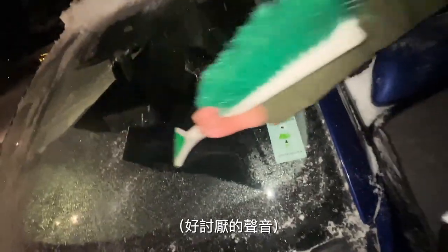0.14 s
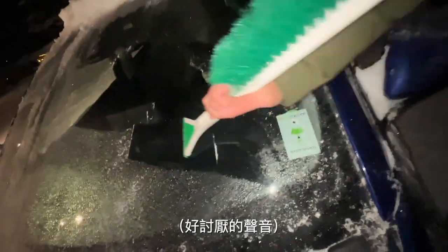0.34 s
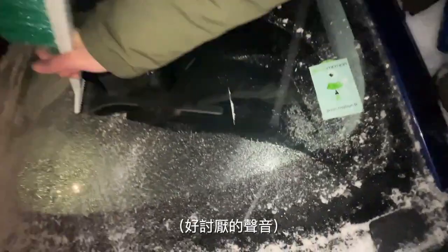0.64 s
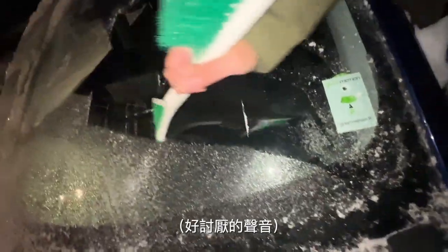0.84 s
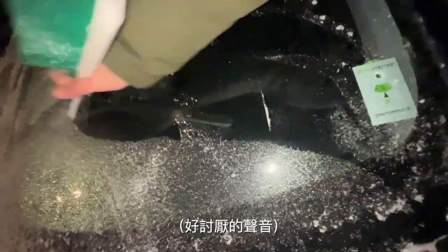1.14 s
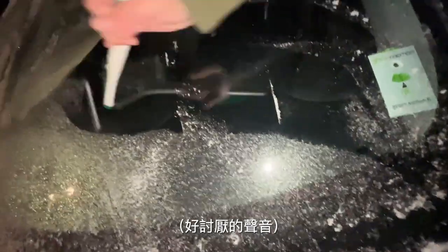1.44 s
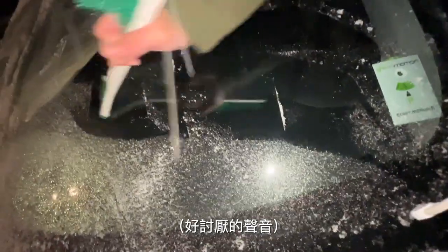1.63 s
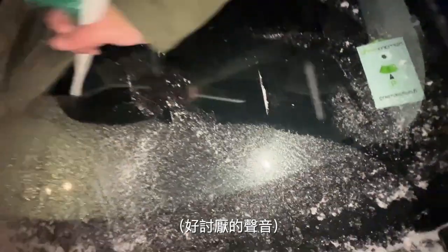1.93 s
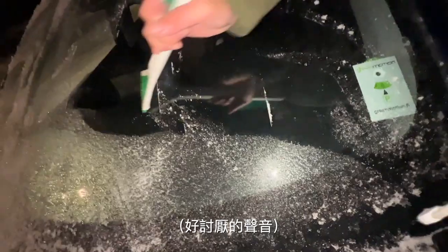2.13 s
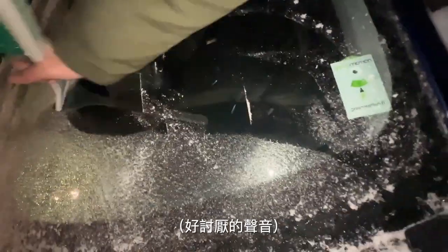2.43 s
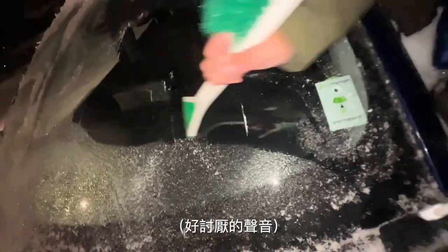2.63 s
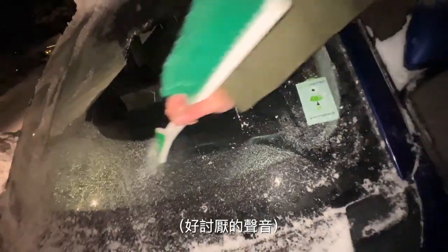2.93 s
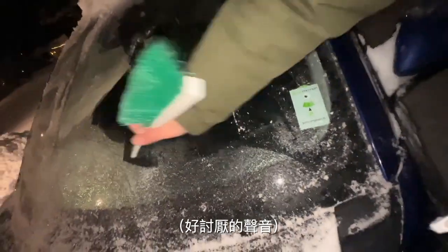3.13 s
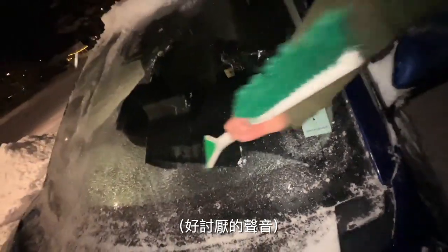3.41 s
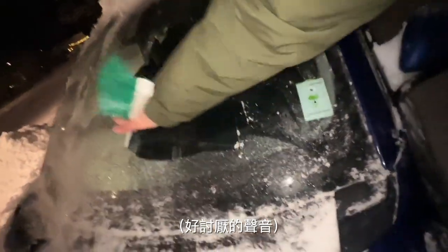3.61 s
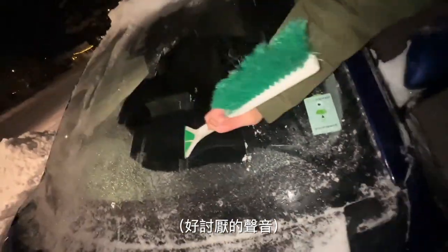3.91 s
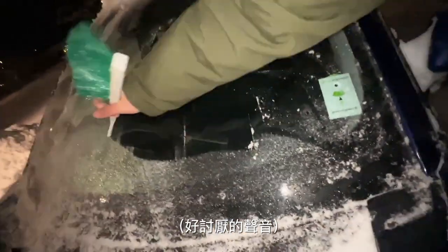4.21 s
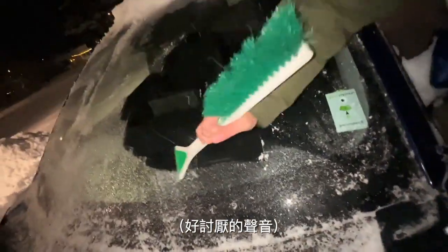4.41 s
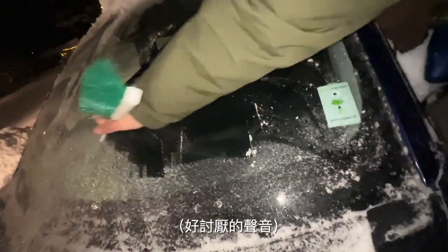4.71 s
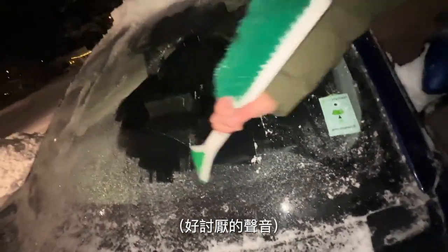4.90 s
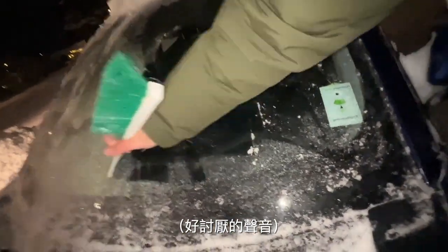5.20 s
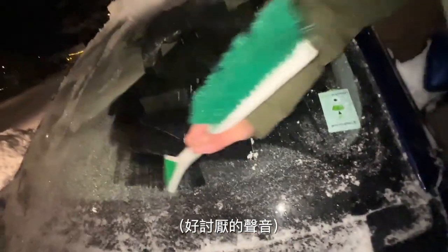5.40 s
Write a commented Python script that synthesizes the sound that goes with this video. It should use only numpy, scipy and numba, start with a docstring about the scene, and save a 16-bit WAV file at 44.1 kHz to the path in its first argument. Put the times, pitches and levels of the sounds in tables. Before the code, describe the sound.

Harsh, gritty ice scraping in short uneven strokes on a windshield, the pane booming lightly, over a steady quiet engine hum.

```python
"""Scraping a frosted windshield

A plastic scraper goes to and fro over a frosted windshield, close to a two-port phone, in an idling car.
Frost crystals snap under the edge: noise impulses that hiss, ring blade and handle, and drum the glass.
The edge also catches on ice ridges and knocks: short noise bursts into the same kinds of resonance.
The engine is a stack of wavering sines on its firing rate; the outdoor air is faint coloured noise.
Each source has a part common to both ports and a part opposite in them."""
import sys
import numpy as np
from scipy import signal
from scipy.fft import rfft, irfft
from scipy.io import wavfile
from scipy.ndimage import uniform_filter1d
from numba import njit

SR = 44100
rng = np.random.default_rng(int(sys.argv[2]) if len(sys.argv) > 2 else 0)


def store_wav(level_fs):
    """Save 16-bit WAV to argv[1]."""
    pcm = np.round(np.clip(np.atleast_2d(level_fs), -1, 1) * 32767)
    wavfile.write(sys.argv[1], SR, pcm.T.astype(np.int16))


N = 244755

# bearing of the edge on the frost, one curve per stroke: (time [s], hiss level [dB])
STROKE_CURVES = [
    [(0.462, -46), (0.468, -24), (0.478, -19.5), (0.494, -26.5), (0.592, -25.5), (0.628, -32.5),
     (0.64, -81)],
    [(0.665, -49), (0.715, -26), (0.747, -23.5), (0.755, -26), (0.765, -32), (0.769, -26), (0.819, -17.5),
     (0.83, -34)],
    [(0.835, -34), (0.847, -33), (0.859, -25.5), (0.867, -42), (0.877, -23.5), (0.9, -70)],
    [(1.0, -41), (1.008, -29.5), (1.068, -24), (1.074, -29.5), (1.144, -16.5), (1.226, -37.5), (1.25, -56)],
    [(1.265, -45), (1.301, -26.5), (1.401, -17.5), (1.413, -19), (1.43, -46)],
    [(1.655, -61), (1.671, -29), (1.685, -21.5), (1.723, -28), (1.775, -31.5), (1.79, -65)],
    [(1.81, -53), (1.838, -30), (1.846, -26.5), (1.856, -20), (1.9, -28.5), (1.94, -57)],
    [(1.97, -53), (1.974, -48), (1.99, -47), (1.996, -49), (2.014, -28.5), (2.02, -40), (2.068, -47),
     (2.08, -75)],
    [(2.23, -49), (2.248, -34.5), (2.26, -44), (2.27, -40.5), (2.3, -44.5), (2.312, -32), (2.318, -36),
     (2.345, -67)],
    [(2.365, -53), (2.383, -26.5), (2.431, -37), (2.453, -18), (2.471, -24), (2.481, -46.5), (2.499, -48),
     (2.52, -61)],
    [(2.78, -40), (2.796, -42), (2.806, -51), (2.848, -31), (2.936, -19.5), (2.976, -20.5), (3.046, -33),
     (3.07, -57)],
    [(3.16, -38), (3.188, -33), (3.2, -19), (3.236, -19.5), (3.25, -28.5), (3.256, -25), (3.314, -45),
     (3.33, -70)],
    [(3.385, -45), (3.409, -45), (3.415, -34.5), (3.439, -30), (3.469, -24), (3.617, -23), (3.647, -36.5),
     (3.665, -68)],
    [(3.76, -44), (3.776, -18), (3.78, -20), (3.8, -67)],
    [(4.06, -49), (4.066, -27.5), (4.072, -28.5), (4.092, -63), (4.106, -21.5), (4.172, -29), (4.182, -59),
     (4.19, -56)],
    [(4.215, -47), (4.225, -28.5), (4.255, -36), (4.265, -51), (4.285, -42), (4.301, -52), (4.311, -45.5),
     (4.36, -50)],
    [(4.365, -35), (4.373, -25.5), (4.381, -19), (4.403, -29), (4.411, -49), (4.415, -33)],
    [(4.42, -32), (4.446, -28.5), (4.494, -23), (4.522, -16.5), (4.604, -19.5), (4.646, -27), (4.66, -39),
     (4.67, -59)],
    [(4.695, -42), (4.705, -30.5), (4.729, -22), (4.741, -29), (4.77, -51)],
    [(4.775, -44), (4.825, -43.5), (4.869, -28.5), (4.881, -49), (4.887, -24), (4.909, -20), (4.937, -26.5),
     (4.95, -47)],
    [(4.955, -40), (5.027, -20.5), (5.089, -22.5), (5.147, -17), (5.191, -21), (5.213, -27), (5.229, -63),
     (5.235, -49)],
    [(5.245, -50), (5.253, -32.5), (5.279, -18.5), (5.301, -24.5), (5.319, -17.5), (5.443, -24),
     (5.455, -42), (5.46, -42)],
    [(5.485, -40), (5.489, -37.5), (5.519, -34.5), (5.523, -32.5), (5.55, -23)],
]
# grip per stroke, same order: (relative blade ring [dB], blade pitch [Hz], relative handle ring [dB],
# handle pitch [Hz], relative glass drum [dB], drum growth over the stroke [dB], glass pitch [Hz])
STROKE_GRIPS = [(-8.5, 1870, -16.5, 460, -5, 3.5, 158), (-9, 2260, -6.5, 655, -2.5, 5, 210),
                (2, 2400, 3, 790, -2.5, 15, 186), (-12.5, 2000, -16.5, 1020, -4, -7, 203),
                (-10, 1860, -7, 930, -2.5, -4, 240), (-13, 2110, -20, 950, -7, 14.5, 210),
                (-5, 2830, -10.5, 1010, -3.5, -14, 200), (1, 2170, -17, 1000, -13, 3, 125),
                (-14, 2800, -6, 1100, -4, 17, 128), (-9.5, 2920, -7, 1180, -2, -9, 263),
                (-5.5, 2030, -7.5, 850, -4, 6, 210), (-3.5, 2440, -10, 930, -17.5, 16, 170),
                (-12, 1350, -12, 880, -6, 9, 220), (0, 1700, -6, 920, -5.5, -5, 210),
                (-9, 2050, -26, 920, -2, 4, 164), (-10, 3300, -11, 870, -6, -1, 150),
                (-3.5, 2330, -3.5, 760, -1.5, 10, 184), (-15.5, 2030, -16.5, 910, -1.5, -4, 123),
                (-10, 3300, -11, 880, -4, -7, 160), (0, 2400, -7, 900, -10.5, 5.5, 150),
                (-8, 1850, -12, 874, -1.5, -5.5, 180), (-8, 2680, -8, 890, -4, 1, 160),
                (5, 1970, 0.5, 830, 0, -4, 148)]
# edge trailing lightly between strokes, one curve per drag: (time [s], hiss level [dB])
DRAG_CURVES = [
    [(0.0, -42), (0.032, -45), (0.152, -42.5), (0.26, -62)],
    [(0.27, -56.5), (0.418, -47.5), (0.46, -47)],
    [(0.91, -50.5), (1.0, -45.5)],
    [(1.435, -51), (1.471, -46), (1.53, -59)],
    [(2.085, -57), (2.23, -59)],
    [(2.58, -41.5), (2.704, -51.5), (2.76, -56)],
    [(3.075, -54), (3.103, -53.5), (3.16, -47)],
    [(3.805, -55), (3.863, -52), (3.96, -57)],
]
# grip of every drag: columns as STROKE_GRIPS
DRAG_GRIP = (-2, 2100, -14, 880, -2.5, -5, 123)
# blade sings out: (time [s], half length [s], ring gain [dB], pitch [Hz])
BLADE_SURGES = [(0.48, .015, 2, 2080), (0.56, 0.014, 9, 2140), (0.812, 0.017, 10.5, 2200),
                (1.385, .03, 8, 1950), (1.742, 0.023, 17, 2160), (2.78, 0.023, 16, 1930),
                (2.93, 0.044, 7, 2400), (3.212, 0.015, 2.5, 2430), (3.48, 0.016, 14, 2740),
                (3.587, 0.01, 17.5, 2370), (4.395, 0.01, 6.5, 2260), (4.453, 0.044, 16.5, 1790),
                (4.556, 0.024, 1.5, 2140), (5.035, 0.031, 13, 2570), (5.112, 0.016, 2, 2100),
                (5.417, .05, 13, 2480)]
# hand leans in, pane booms: (time [s], half length [s], drum gain [dB], pitch [Hz])
GLASS_THUMPS = [(.49, 0.018, 7, 190), (.61, 0.038, 3, 170), (.715, 0.019, 5, 200), (1.16, 0.031, 0.5, 205),
                (1.37, 0.054, 3, 228), (1.76, 0.031, 2.5, 210), (2.99, 0.029, 3, 167),
                (3.49, 0.018, 8.5, 205), (3.615, 0.05, 8.5, 188), (4.39, 0.013, 2, 185),
                (4.55, 0.07, 2.5, 191), (4.915, 0.027, 11.5, 192), (5.05, 0.022, 1.5, 180),
                (5.18, 0.036, 4.5, 140)]
# edge catches on ice ridges: (time [s], burst peak before colouring [dB], 60 dB decay [s],
# blade drive over burst [dB])
KNOCKS = [(0.0839, -21, 0.019, -11), (0.176, -38.5, 0.02, 10), (0.4763, -9, 0.016, -11),
          (0.5152, -14, 0.013, -18), (0.6654, -25, 0.012, -19), (0.6974, -12, 0.016, -14),
          (0.7147, -7, 0.013, -15), (0.7532, -2, 0.011, -19), (0.7727, -6.5, 0.011, -6),
          (0.7874, -13, 0.017, -2), (0.7998, -10.5, 0.019, 2), (0.8116, -12, 0.013, -13),
          (0.857, -10, 0.013, 1.5), (0.8736, -24.5, 0.013, 8), (0.9183, -30, 0.011, 5),
          (0.9325, -32.5, 0.012, 8), (0.9507, -33, 0.0099, -2), (1.061, -8.5, 0.011, -24),
          (1.2868, -19, 0.017, -3), (1.4526, -24.5, 0.016, -17), (1.492, -20.5, 0.017, -27),
          (1.6725, -12, 0.0045, -16), (1.8383, -13.5, 0.013, 1), (1.8557, -6.5, 0.013, -9),
          (1.9743, -25, 0.0083, -23), (1.9974, -17.5, 0.0096, -22), (2.0112, -13, 0.012, -5),
          (2.2722, -20, 0.013, -24), (2.3088, -23, 0.0069, -2), (2.383, -15, 0.0073, -9),
          (2.4515, -4, 0.017, -7.5), (2.596, -10, 0.0088, 4.5), (2.6218, -7, 0.011, 6.5),
          (2.6933, -42, 0.013, -8), (2.737, -24, 0.022, -12), (2.7872, -32.5, 0.014, 3),
          (3.131, -30, 0.015, -1), (3.1628, -20, 0.013, -14), (3.1744, -15.5, 0.013, -15),
          (3.2004, -7.5, 0.015, -5), (3.2567, -10, 0.02, 6.5), (3.3892, -26.5, 0.012, 4.5),
          (3.415, -17, 0.011, -12), (3.7699, -4.5, 0.017, -16), (3.8566, -33, 0.012, 1),
          (3.8643, -30.5, 0.025, -1), (3.9114, -34.5, 0.01, 9), (4.0677, -12, 0.013, -17),
          (4.0796, -22, 0.014, -11), (4.1047, -6.5, 0.013, -3.5), (4.2253, -18, 0.0079, -20),
          (4.2742, -29, 0.013, -6), (4.2827, -16, 0.011, -14), (4.376, -6, 0.011, -1),
          (4.7002, -23, 0.015, -20), (5.1061, -9, 0.025, -13), (5.3551, -1.5, 0.011, -5),
          (5.3992, -8, 0.0097, 3), (5.4894, -17.5, 0.0064, -6), (5.523, -13, 0.014, -7)]
# low modes of the windshield: (centre [Hz], width [Hz], relative level [dB])
GLASS_MODES = [(105, 13, -5), (131, 54, -1), (201, 10, -18), (210, 53, 2), (309, 16.6, 4.5),
               (364, 34, -0.5), (413, 32, -30), (621, 53, -9)]
# blade ring width, far and near part of the glass; the flatter near grip damps it: (far [Hz], near [Hz])
BLADE_WIDTHS_HZ = 650, 1540
# common frost hiss, far and near part of the glass: (frequency [Hz], relative density [dB per Hz])
HISS_FAR = [(400, -22), (1500, -6), (2600, -7), (3600, -2.5), (4900, -5.5), (6300, -2), (7200, -6.5),
            (8200, -3.5), (11200, -10.5), (11600, -23), (12100, -52), (16000, -64)]
HISS_NEAR = [(400, -11), (950, -15.5), (1500, -1), (3100, -6.5), (4600, -3), (5600, -1), (8000, -2.5),
             (11200, -8), (11600, -20), (12100, -61), (16000, -62)]
# opposite frost hiss, far and near: (frequency [Hz], relative density [dB per Hz])
SIDE_FAR = [(300, -7.5), (700, 1), (1700, -3.5), (3200, 7.5), (4900, 4.5), (6500, -4), (8800, 1.5),
            (11000, -1), (12500, -4), (15700, -10), (16100, -50)]
SIDE_NEAR = [(300, -13), (900, 2.5), (1700, -27), (2400, 4), (3300, 9.5), (5000, 2), (5800, -7),
             (7500, -15), (8600, 4), (9500, -9), (11000, 5.5), (12500, -5.5), (15700, -4), (16100, -50)]
# two narrow bands where the ports cancel, near part only: (frequency [Hz], gain [dB])
NEAR_DIPS = [(760, 2), (950, -9.5), (1150, 3), (4500, 0), (4950, -7), (5400, -0.5)]
# engine orders: (multiple of the firing rate, relative level [dB])
ENGINE_ORDERS = [(1, -12.5), (2, 3), (3, -2), (4, -15), (5, -24), (6, -18), (7, -19), (8, -17.5)]
# outdoor air, common and opposite: (frequency [Hz], relative density [dB per Hz])
AIR_MID = [(20, -40), (32, -31), (52, 1), (85, -6), (175, -4), (390, -11.5), (625, -23), (1420, -29.5),
           (1950, -23), (4900, -45.5), (6400, -35.5), (11000, -36.5), (11800, -42), (16000, -90)]
AIR_SIDE = [(25, -25), (114, -1), (230, 6.5), (440, 7.5), (1100, -1.5), (1620, -9), (3100, -8), (4900, -18),
            (6600, -31), (8500, -15), (11100, -10), (15700, -17), (16100, -60)]
# microphone ports: (frequency [Hz], left over right [dB])
PORT_TILT = [(380, -1), (650, -4.5), (1200, 1.5), (2700, -1.5), (3600, 1), (8000, 0.5)]

MOVE_S = 2.7  # the hand moves on to the near part of the glass
PRESSED_DB = -31.5  # hiss level at which the grip values hold
BLADE_DB_PER_DB, HANDLE_DB_PER_DB, GLASS_DB_PER_DB = 0.55, 0.62, -0.1949  # ring share vs pressure
GLASS_HZ_PER_DB = -1.5  # answering glass mode falls as the push rises
GLASS_LAG_S = 0.0088  # the pane takes up and gives back the push slowly
IDLE_HZ, IDLE_DB = 34.84, -35
AIR_MID_DB, AIR_SIDE_DB = -42, -49.5
TOP_HZ = 16500


def strokes():
    """Snapping frost: hiss, blade and handle rings and glass drum, as (common, opposite) parts."""
    hiss_db, (blade_db, blade_hz, handle_db, handle_hz, glass_db, glass_hz) = contact()
    keep = np.exp(-1 / (GLASS_LAG_S * SR))
    push_db = 20 * np.log10(signal.lfilter([1 - keep], [1, -keep], undb(hiss_db)))
    press_db = hiss_db - PRESSED_DB
    lagged_press_db = push_db - PRESSED_DB

    blade_db, blade_hz = sing(BLADE_SURGES, blade_db + BLADE_DB_PER_DB * press_db, blade_hz)
    handle_db = handle_db + HANDLE_DB_PER_DB * press_db
    # the drum follows the lagged push, not the hiss that scales the sum below
    glass_db = glass_db + GLASS_DB_PER_DB * lagged_press_db + push_db - hiss_db
    glass_hz = np.maximum(glass_hz + GLASS_HZ_PER_DB * lagged_press_db, 120)
    glass_db, glass_hz = sing(GLASS_THUMPS, glass_db, glass_hz)

    size = crystals(16000, spread_db=0.5, judder_db=1.0, judder_hz=155.2,
                    slips_per_s=160, slip_s=0.00061, slip_gain=2.24)
    snap = level(size * rng.standard_normal(N), 0)
    other_snap = level(size * rng.standard_normal(N), 0)
    edge = level(patchy(snap, depth_db=3.0, per_s=75, width_hz=254.0, plain_db=-1.5), 0)

    width_hz = place(*BLADE_WIDTHS_HZ)
    blade = ring(ring(edge, blade_hz, width_hz), blade_hz, width_hz) / np.sqrt(width_hz)
    handle = ring(ring(snap, handle_hz, 470), handle_hz, 470)
    # the place of the edge on the pane decides which mode answers; it rubs in lumps
    answer = drum(snap) + undb(5) * ring(snap, glass_hz, 72)
    glass = level(undb(2.5 * walk(60)) * answer, 0)

    common = level(hissing(edge), 0)
    common = common + level(blade, -8.5) * undb(blade_db)
    common = common + level(handle, -8) * undb(handle_db)
    common = common + glass * undb(glass_db)
    # one port hears other snaps along the edge more closely
    side = level(opposite(other_snap), -2.1) * undb(0.05 * blade_db)
    return np.array([common, side]) * undb(hiss_db)


def contact(lifted_db=-62):
    """Hiss level, and the grip of whichever stroke or drag presses hardest; the drum grows along it."""
    curves = DRAG_CURVES + STROKE_CURVES
    levels_db = np.array([pressure(c, lifted_db) for c in curves])
    now = levels_db.argmax(axis=0)
    start_s, end_s = np.array([(c[0][0], c[-1][0]) for c in curves])[now].T
    grip = np.array([DRAG_GRIP] * len(DRAG_CURVES) + STROKE_GRIPS, float)[now].T
    progress = np.clip((np.arange(N) / SR - start_s) / (end_s - start_s), 0, 1)
    grip[4] += grip[5] * (progress - .5)
    grip = np.delete(grip, 5, axis=0)  # growth is spent
    return levels_db.max(axis=0), uniform_filter1d(grip, size=300, axis=1)


def pressure(curve, lifted_db, fade_s=0.013):
    """Hiss level of one curve per sample; before and after it the edge is off the frost."""
    s, db = np.transpose(curve)
    s = np.r_[s[0] - fade_s, s, s[-1] + fade_s]
    return np.interp(np.arange(N) / SR, s, np.r_[lifted_db, db, lifted_db])


def crystals(per_s, spread_db, judder_db, judder_hz, slips_per_s, slip_s, slip_gain):
    """Snap size per sample: mostly fine powder, in uneven shoves; the edge sticks, then slips in a spurt."""
    snaps = (rng.random(N) < per_s / SR) * undb(spread_db * rng.exponential(1, N))
    slips = (rng.random(N) < slips_per_s / SR) * rng.random(N)
    spurts = signal.lfilter([1], [1, -np.exp(-1 / (slip_s * SR))], slips)
    return snaps * undb(judder_db * walk(judder_hz)) * (1 + slip_gain * spurts)


def patchy(snap, depth_db, per_s, width_hz, plain_db):
    """Many short edge rings come and go, each on its own, as the grip and the angle change."""
    rings = np.zeros(N)
    for hz in np.arange(1300., 11500., 420.):
        gain = undb(depth_db * walk(per_s))
        rings += gain * ring(snap, hz + 90 * walk(14.0), width_hz)
    return level(rings, 0) + level(snap, plain_db)


def sing(swells, db, hz):
    """Each swell lifts a ring and draws it to its own pitch."""
    for s, half_s, gain_db, swell_hz in swells:
        swell = np.exp(-((np.arange(N) / SR - s) / half_s) ** 2)
        db, hz = db + gain_db * swell, hz + (swell_hz - hz) * swell
    return db, hz


def drum(force):
    """Low windshield modes driven by a force; the pane is too small to radiate deep bass."""
    modes = sum(undb(db) * ring(force, hz, width_hz) for hz, width_hz, db in GLASS_MODES)
    return colour(modes, [(30, -26), (80, 1)])


def hissing(snap):
    """Colour of the common hiss, by the part of the glass that is scraped."""
    return place(colour(snap, HISS_FAR), colour(snap, HISS_NEAR))


def opposite(snap):
    """Colour of the part that is opposite in the two ports."""
    return place(colour(snap, SIDE_FAR), colour(snap, SIDE_NEAR))


def place(far, near):
    """First value while the far part of the glass is scraped, then the second."""
    return np.where(np.arange(N) < MOVE_S * SR, far, near)


def knocks(rise=0.048, blade_hz=2400, side_db=-3, glass_db=-4):
    """Short cracks into blade and glass; rise is a fraction of the decay time."""
    t = np.arange(int(.04 * SR)) / SR
    crack, blade_force = np.zeros((2, N + len(t))), np.zeros(N + len(t))
    noises = rng.standard_normal((len(KNOCKS), 2, len(t)))
    for (s, db, t60_s, blade_db), noise in zip(KNOCKS, noises):
        u = t / t60_s
        burst = noise * (1 - np.exp(-u / rise)) * np.exp(-np.log(1000) * u)
        burst = burst * undb(db) / np.abs(burst).max(axis=1, keepdims=True)
        i = int(s * SR)
        crack[:, i:i + len(t)] += burst
        blade_force[i:i + len(t)] += burst[0] * undb(blade_db)
    common_crack, side_crack = crack[:, :N]
    hiss = undb(5.0) * hissing(common_crack)
    blade = undb(8.5) * ring(blade_force[:N], blade_hz, 1180)
    glass = undb(glass_db) * drum(common_crack)
    return np.array([hiss + blade + glass, undb(side_db) * opposite(side_crack)])


def engine():
    """Idle: orders of a slightly wavering firing rate, each with its own slow swell."""
    phase = 2 * np.pi * np.cumsum(IDLE_HZ * (1 + 0.0093 * walk(10))) / SR
    stack = sum(undb(db + 0.59 * k * walk(9)) * np.sin(k * phase) for k, db in ENGINE_ORDERS)
    return level(stack, IDLE_DB) * np.array([[1], [.09]])  # common, opposite


def air():
    """Outdoor rumble and hiss: coloured noise that flutters a little."""
    mid, side = (rng.standard_normal(N) * undb(1.5 * walk(6)) for _ in range(2))
    return np.array([level(colour(mid, AIR_MID), AIR_MID_DB), level(colour(side, AIR_SIDE), AIR_SIDE_DB)])


def undb(db):
    """Gain of a level in dB."""
    return 10 ** (np.asarray(db) / 20)


def level(x, db):
    """Scale to an rms level."""
    return x * undb(db) / np.sqrt(np.mean(x ** 2))


def colour(x, points, share=1):
    """Filter by (Hz, dB) points joined on a log-frequency axis; share scales the dB."""
    hz, db = np.transpose(points)
    f = np.maximum(np.arange(N // 2 + 1) * SR / N, 1)
    return irfft(rfft(x) * undb(share * np.interp(np.log(f), np.log(hz), db)), N)


def ring(x, hz, width_hz):
    """One resonance; centre and width are numbers or curves."""
    return svf(x, hz + np.zeros(N), width_hz + np.zeros(N))


@njit
def svf(x, hz, width_hz):
    """State-variable band-pass with moving centre and width, gain 1 at the centre."""
    y, band, low = np.empty(len(x)), 0., 0.
    for i in range(len(x)):
        g, k = np.tan(np.pi * hz[i] / SR), width_hz[i] / hz[i]
        v = (band + g * (x[i] - low)) / (1 + g * (g + k))
        band = 2 * v - band
        low = low + 2 * g * v
        y[i] = k * v
    return y


def walk(rate_hz):
    """Random levels held 1 / rate_hz and slewed twice; spread near 1, no far outliers."""
    k = int(SR / rate_hz)
    held = np.repeat(np.clip(rng.standard_normal(N // k + 1), -1.7, 1.7), k)
    return 1.4 * uniform_filter1d(uniform_filter1d(held, k), k)[:N]


def scene():
    """Common and opposite parts become left and right."""
    mid, side = strokes() + knocks()
    scraper = np.array([place(mid, colour(mid, NEAR_DIPS)), side])
    mid, side = scraper + air() + engine()
    return np.array([mid + side, mid - side])


def record(dry):
    """The two ports differ in colour below the top octave; the phone rounds peaks and cuts the top."""
    tilt = PORT_TILT + [(10500, 0)]
    ports = np.array([colour(dry[0], tilt, .5), colour(dry[1], tilt, -.5)])
    rounded = 1.1 * np.tanh(ports / 1.1)
    return signal.sosfilt(signal.ellip(12, .2, 110, TOP_HZ, fs=SR, output="sos"), rounded)


dry = scene()
out = record(dry)
store_wav(out)
```